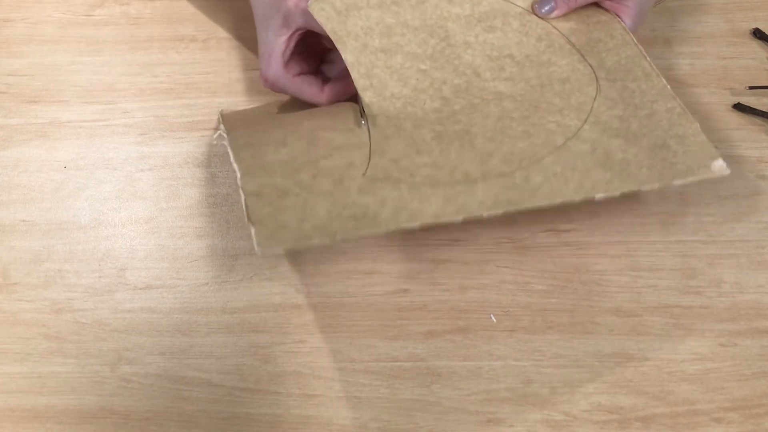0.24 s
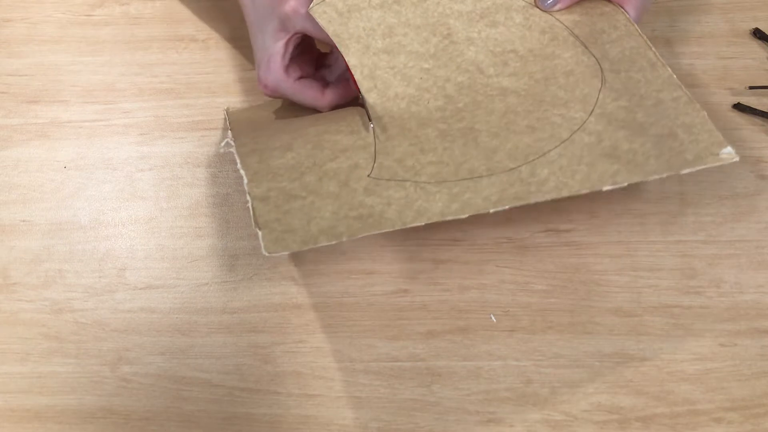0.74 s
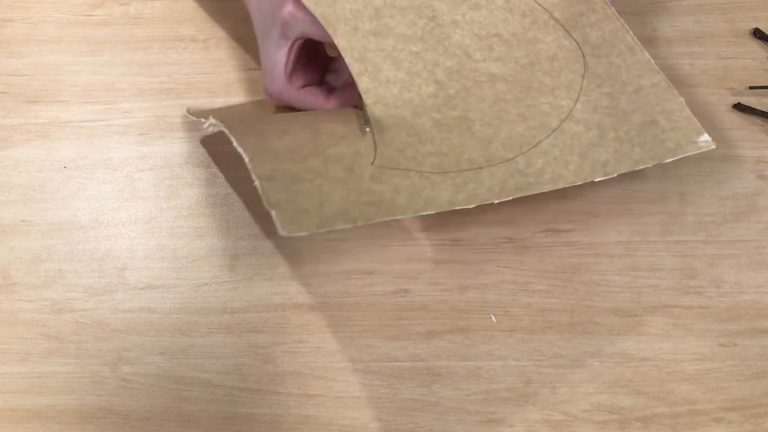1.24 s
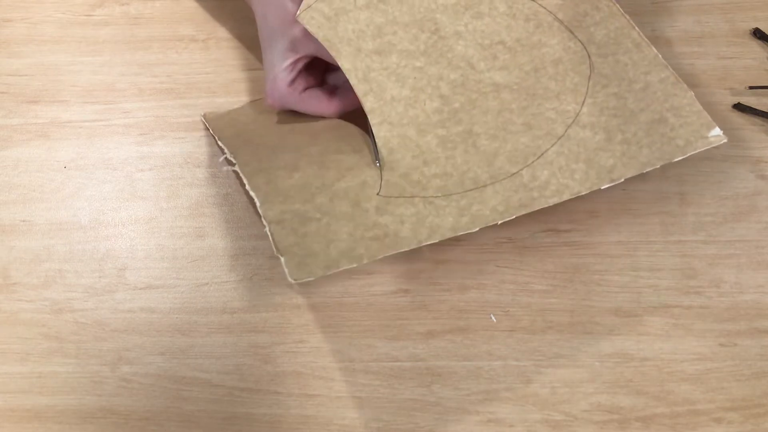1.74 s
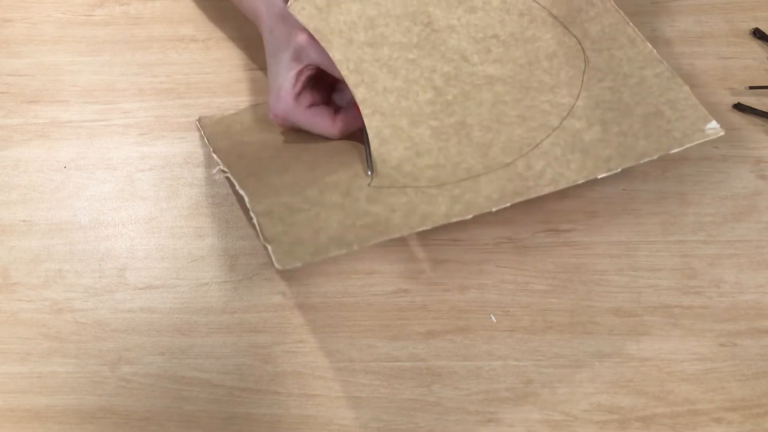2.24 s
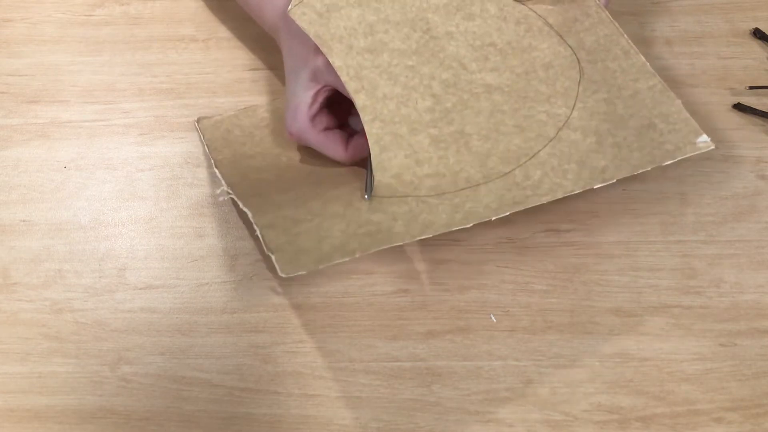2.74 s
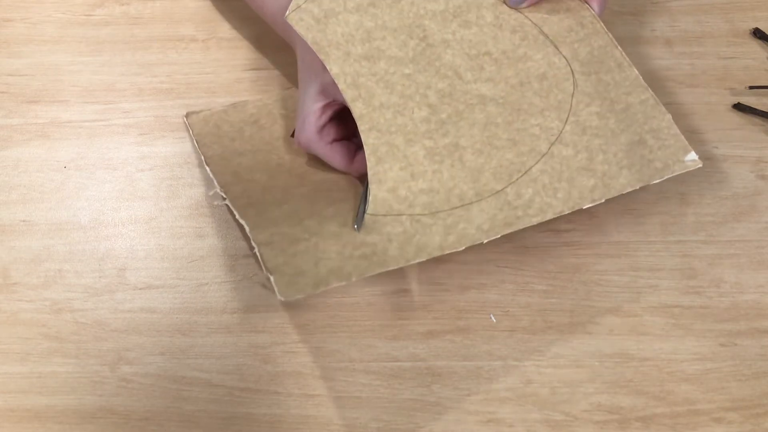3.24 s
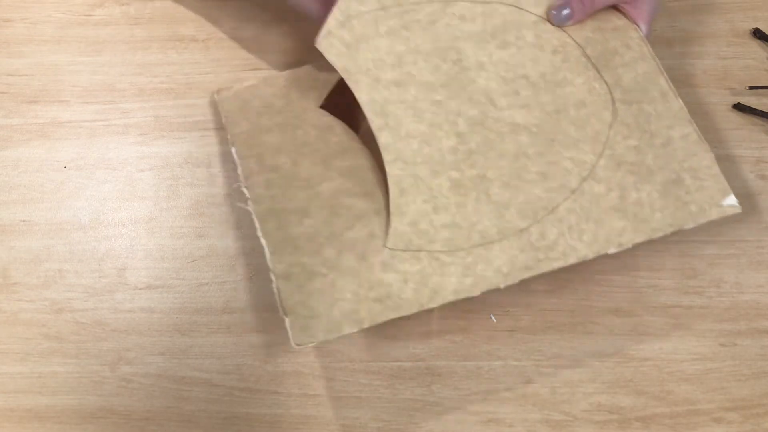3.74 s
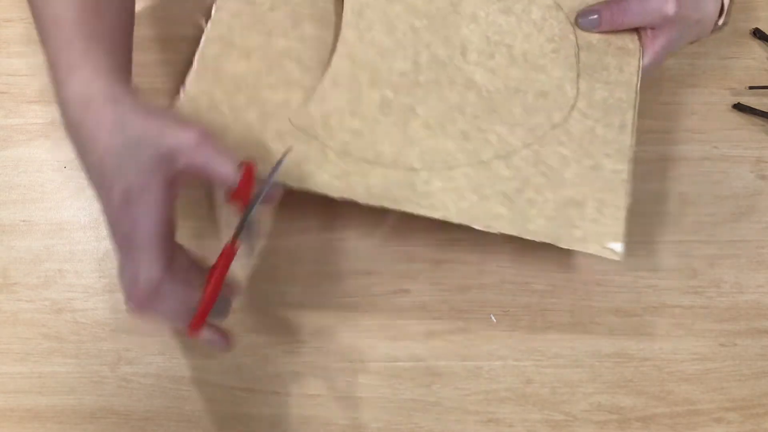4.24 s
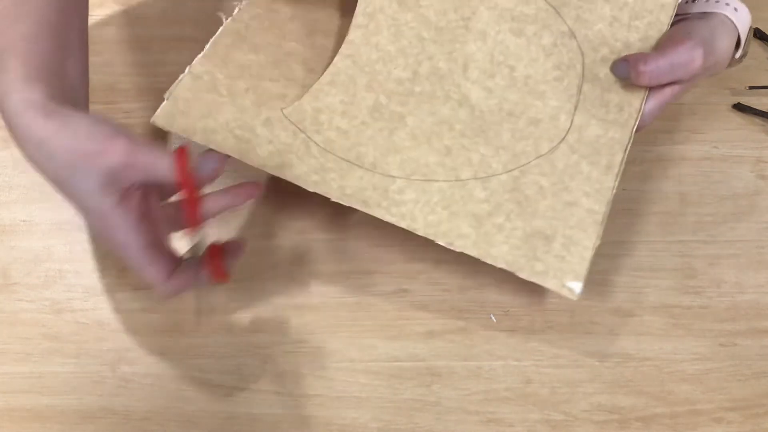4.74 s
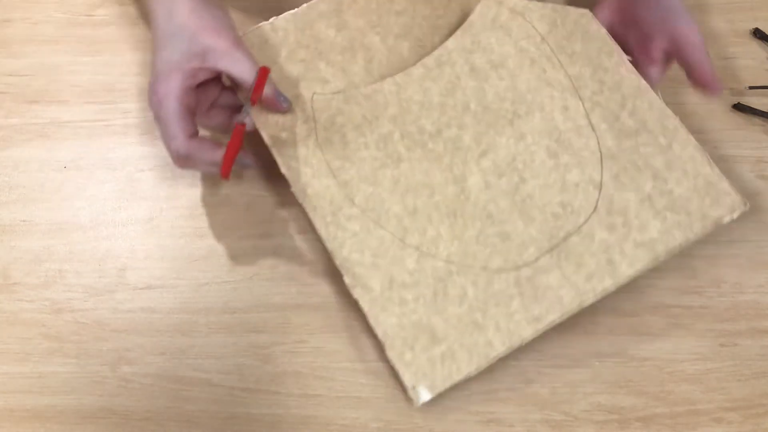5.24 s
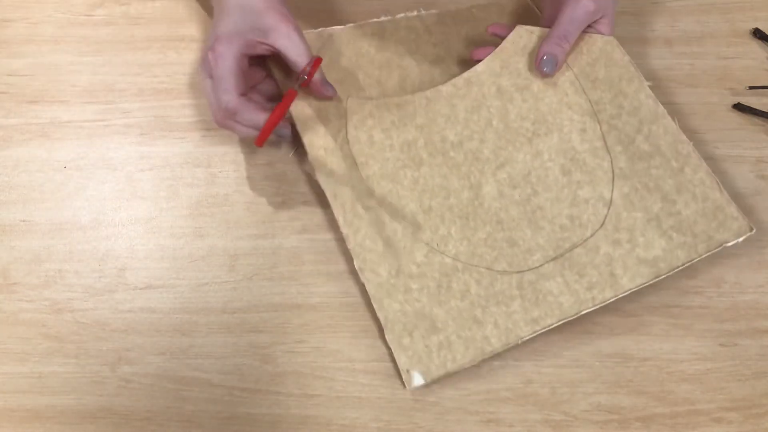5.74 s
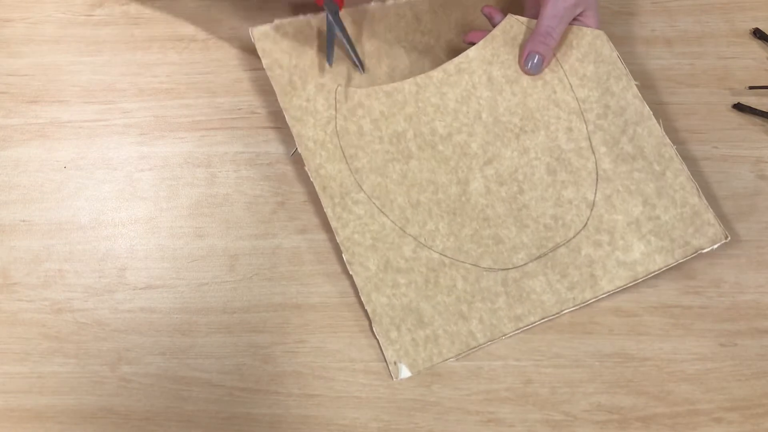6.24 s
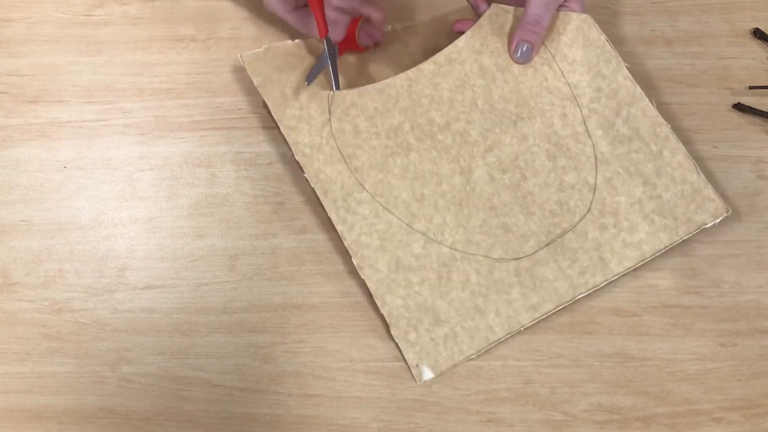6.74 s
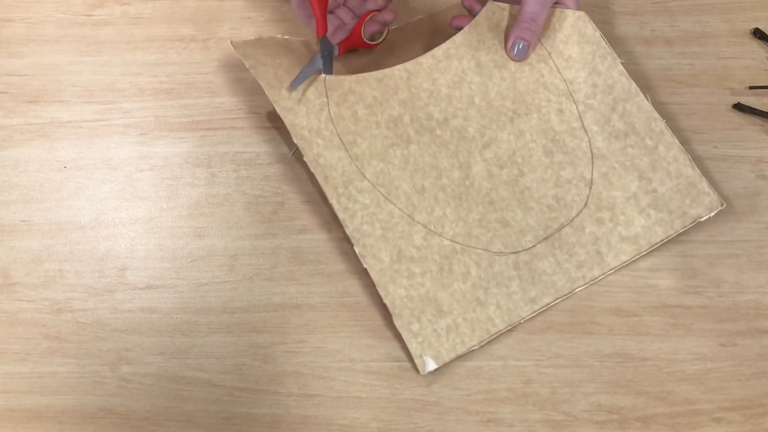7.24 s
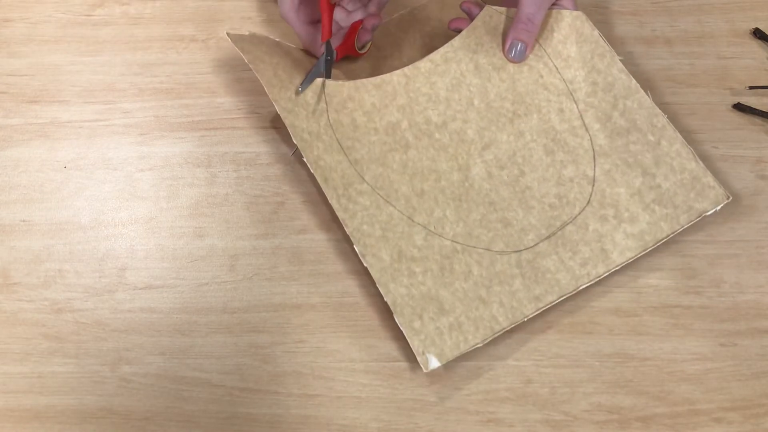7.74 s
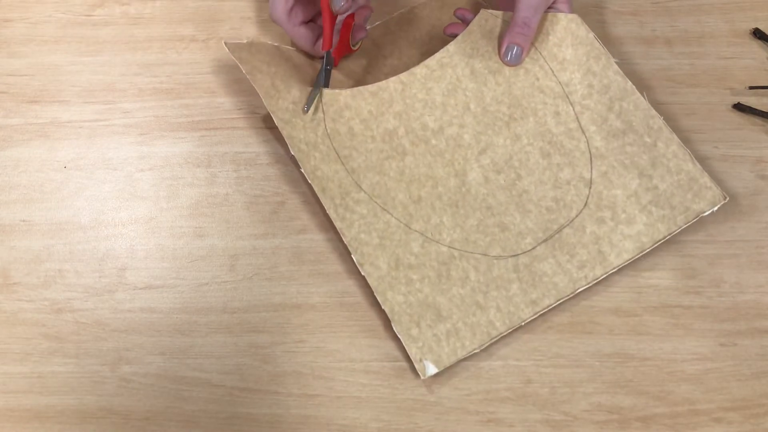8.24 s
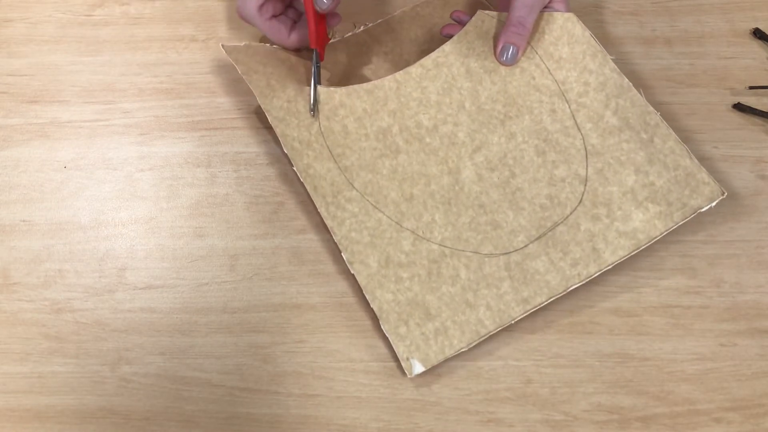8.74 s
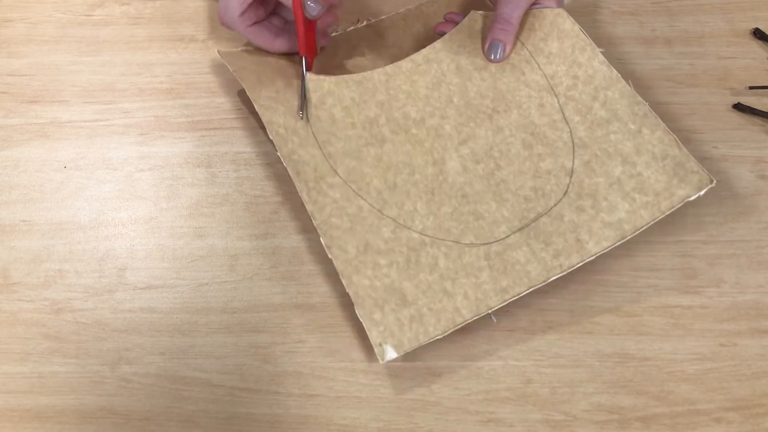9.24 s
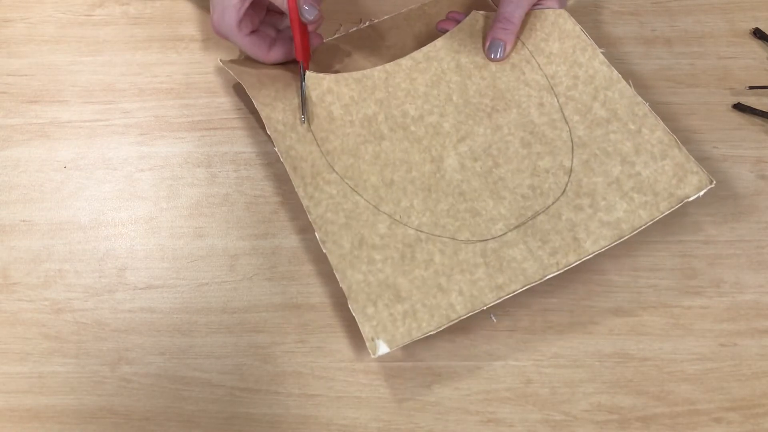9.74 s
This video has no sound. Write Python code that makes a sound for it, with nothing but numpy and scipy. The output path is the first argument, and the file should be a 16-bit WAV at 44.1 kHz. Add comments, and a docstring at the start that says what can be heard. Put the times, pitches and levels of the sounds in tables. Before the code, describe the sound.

Small scissors crunch through cardboard in short strokes, with scrapes and knocks as the sheet is turned, in a quiet room.

```python
"""Short crunches, close to a single microphone: small scissors cut corrugated cardboard just above a
wooden table, in a small, quiet room with a low hum. Each closing stroke crushes a run of flutes;
between strokes the blades slide on through the slit. The tips snap shut, the scissors are drawn out,
the sheet is turned, scraped and knocked, the table booms softly, and a second, gentler cut begins."""
import sys
import numpy as np
from scipy import signal
from scipy.fft import rfft, irfft
from scipy.io import wavfile

SR = 44100
rng = np.random.default_rng(int(sys.argv[2]) if len(sys.argv) > 2 else 0)


def inscribe(sig):
    """Save sig as 16-bit PCM at rate SR to the path in sys.argv[1].

    A 1-D sig is mono; a 2-D sig holds one channel per row.
    Samples are clipped to [-1, 1] before scaling.
    """
    pcm = np.round(np.clip(np.atleast_2d(sig).T, -1, 1) * 32767)
    wavfile.write(sys.argv[1], SR, pcm.astype(np.int16))


N = 440118
TREBLE_HZ = 4500
# closing strokes: start_s, length_s, shear_db, crunch_bass_db, crunch_treble_db, sheet_hz
STROKES = [(0, 0.054, -51.5, -3.5, -5, 864), (0.883, .14, -54, -2.5, -4.5, 865),
           (1.522, .17, -56, -2, -3, 740), (2.143, 0.16, -59, -3, -3.5, 830),
           (2.603, 0.07, -49, -8.5, -4.5, 850), (3.052, 0.084, -62, -3, 1, 810),
           (3.218, .12, -72, -5, -3.5, 1030), (8.689, 0.049, -51.5, -15, -4, 960),
           (8.798, 0.31, -67.5, -14, -5, 1004), (9.779, 0.13, -54, -11, -8.5, 925)]


def undb(db):
    """Decibels to gain."""
    return 10 ** (np.asarray(db) / 20)


def unit(x):
    """Scale to rms 1."""
    return x / np.sqrt(np.mean(x ** 2) + 1e-24)


def band(x, hz, width):
    """One resonance, gain 1 at its centre."""
    hz = min(hz, .45 * SR)
    return signal.lfilter(*signal.iirpeak(hz, hz / width, fs=SR), x)


def butter(x, hz, kind, order=4):
    """Butterworth filter."""
    return signal.sosfilt(signal.butter(order, hz, kind, fs=SR, output="sos"), x)


def colour(x, points, size=2048):
    """Minimum-phase filter through (Hz, dB) points, falling 12 dB an octave below the first."""
    hz, db = np.transpose(points)
    freq = np.maximum(np.arange(size // 2 + 1) * SR / size, 1)
    gain_db = np.interp(np.log(freq), np.log(hz), db) - 12 * np.maximum(np.log2(hz[0] / freq), 0)
    cepstrum = irfft(np.log(undb(gain_db)))
    cepstrum[1:size // 2] *= 2
    cepstrum[size // 2 + 1:] = 0
    return signal.fftconvolve(x, irfft(np.exp(rfft(cepstrum))))[:len(x)]


def balance(x, levels_db):
    """Bring each band of a hit to its level, taken as rms over 10 ms."""
    # bass, body, bite and treble: low_hz, high_hz
    band_edges = [(250, 650), (650, 1600), (1600, 4500), (4500, 15000)]
    power = 2 * abs(rfft(x)) ** 2 / len(x) / (SR / 100)
    hz = np.arange(len(power)) * SR / len(x)
    points = []
    for (low, high), db in zip(band_edges, levels_db):
        gain_db = db - 10 * np.log10(power[(hz >= low) & (hz < high)].sum() + 1e-20)
        points += [(low * 1.22, gain_db), (high / 1.15, gain_db)]
    return colour(x, points)


def envelope(t, attack, hold, sag_db, release_s):
    """A movement gathers speed, drops by sag_db while it lasts, then dies away."""
    rise = np.clip(t / max(attack, .002), 0, 1) ** 2
    sag = undb(-sag_db * np.clip((t - attack) / max(hold, .002), 0, 1))
    return rise * sag * np.exp(-np.maximum(t - attack - hold, 0) / release_s)


def tail(t, t60):
    """Dying noise of unit energy."""
    ring = rng.standard_normal(len(t)) * np.exp(-np.log(1000) * t / t60)
    return ring / np.linalg.norm(ring)


def fibres(count, per_s, spread_db):
    """Paper fibres snap at random, with unequal force."""
    snaps = (rng.random(count) < per_s / SR) * rng.choice([-1, 1], count)
    return unit(snaps * undb(spread_db * np.minimum(rng.exponential(size=count), 5)))


def sheet(force):
    """A force on the cardboard plus the resonances that it rings."""
    # resonances of sheet and blades: pitch_hz, width_hz, level_db
    sheet_modes = [(356, 9, 4), (415.5, 17, 6), (491, 64, -17), (882, 120, -5), (1210, 55, -23),
                   (1710, 87, -26), (2580, 300, -29), (3236, 104, -14.5), (4105, 34, -7.5), (6800, 67, -33),
                   (9000, 740, -15)]
    return force + sum(undb(db) * band(force, hz, width) for hz, width, db in sheet_modes)


def fractures(rows, rise_ms, ring_db, flutter_db, flutter_t60, tear_db, tear_ms):
    """Each hit is a few milliseconds of dense snapping that shakes the sheet."""
    # tone of crushed board: frequency_hz, gain_db
    crunch_colour = [(160, -17), (280, -12), (343, -7.5), (457, -11.5), (498, -4.5), (931, 9), (1420, 4),
                     (1800, 4), (4060, -4.5), (5420, -21), (6750, -19.5), (15000, -30), (16000, -51)]
    out, t = np.zeros(N + SR), np.arange(4096) / SR
    for start_s, db, bass_db, bite_db, treble_db, sheet_hz, length_ms in rows:
        push = (1 - np.exp(-t * 1000 / rise_ms)) * np.exp(-(t * 1000 / length_ms) ** 3)
        crush = fibres(len(t), per_s=15000, spread_db=1.5) * push
        # a few last fibres tear after the board has given way
        tear = fibres(len(t), per_s=1400, spread_db=12) * undb(tear_db) * np.exp(-t * 1000 / tear_ms)
        direct = colour(sheet(crush + tear), crunch_colour)
        # the free part of the sheet rings at a pitch set by how it is bent
        direct += undb(ring_db) * band(direct, sheet_hz, sheet_hz / 6)
        # bending waves run on through the board; the treble dies at once
        flutter = signal.fftconvolve(direct, tail(t, flutter_t60))[:len(t)]
        flutter = butter(flutter, 2500, "lowpass", order=2)
        hit = balance(direct + undb(flutter_db) * flutter, [bass_db, 0, bite_db, treble_db])
        start = int(start_s * SR)
        out[start:start + len(t)] += hit * undb(db)
    return out[:N]


def crunches():
    """Snaps take the tone of their stroke; harder ones are duller, lesser ones fall at random."""
    # louder snaps: flutes giving way, and the blade tips snapping shut as the first cut ends
    # start_s, level_db, brightness_db, length_ms
    loud_snaps = [(.002, -36.5, -8.5, 3.4), (.024, -39, -3, 8.1), (0.034, -42, -7, 3.2),
                  (.0475, -32.5, -9, 6.5), (.886, -44.5, -3.5, 9.8), (.895, -44, -2.5, 21),
                  (.924, -36, -8.5, 7), (.952, -35, -9, 5.5), (0.962, -37.5, -3.5, 8.5),
                  (0.9994, -32, -8.5, 3.3), (1.027, -46, -1.5, 5.5), (1.525, -44, 1.5, 11),
                  (1.551, -39, -6, 7.5), (1.567, -44, 1.5, 6.2), (1.59, -45, -5, 2.8),
                  (1.605, -38, -1, 8.5), (1.626, -39, -12, 9.2), (1.6492, -35, -2, 5.8),
                  (1.671, -45.5, -4, 3.6), (1.691, -47.5, -0.5, 4), (2.145, -50, 2, 4.1),
                  (2.153, -41.5, -4, 14.7), (2.179, -39.5, -1, 9.1), (2.187, -40.5, -4, 7.1),
                  (2.196, -41.5, -6, 7), (2.209, -40.5, -3.5, 7.6), (2.227, -42, -5, 14.5),
                  (2.254, -48.5, 2, 4.8), (2.261, -52, -2, 23), (2.284, -48, -4, 3.1),
                  (2.615, -46.5, -9, 9.8), (2.63, -41, -4.5, 11), (2.644, -44.5, 0.5, 10),
                  (2.679, -46, -1, 2.1), (2.668, -47, 0, 7.4), (2.694, -40, -6, 9.2),
                  (2.733, -32, -6.5, 11), (3.056, -49.5, 3.5, 8.6), (3.073, -51, -9, 11),
                  (3.085, -47, -9, 10), (3.1, -43.5, -2.5, 3.9), (3.1267, -38.5, -2.5, 4.7),
                  (3.162, -40.5, -6.5, 3.7), (3.227, -48, 0.5, 2.9), (3.2794, -32, -3, 8),
                  (3.3381, -29.5, -2, 12.5), (8.689, -49.5, 3.5, 8.5), (8.762, -51.5, 0, 4.6),
                  (8.804, -51.5, -4, 5.9), (8.84, -52.5, 2.5, 4), (8.941, -40.5, -2, 7.9),
                  (8.987, -50.5, -2.5, 6.5), (9.034, -57, 1, 2.3), (9.048, -45, -8, 18),
                  (9.0583, -37.5, -4, 1.85), (9.063, -36, -11, 2.8), (9.096, -35, -2, 4.8),
                  (9.824, -43, -3, 8), (9.838, -49.5, 5.5, 11.6), (9.861, -44.5, -1, 9.5),
                  (9.873, -51, -5, 11), (9.89, -39, -2, 1.1)]
    faint_crunch_db, dulling = -51.5, 0.22  # above this level, dB of treble lost per extra dB
    flex_scatter = 0.048  # share by which bending detunes the sheet from snap to snap
    lesser_per_s, lesser_spread_db, lesser_ms = 35, 3, 8.3
    rows, starts = [], [stroke[0] for stroke in STROKES]
    for start_s, db, bright_db, length_ms in loud_snaps:
        stroke = max(np.searchsorted(starts, start_s + .02) - 1, 0)
        *_, bass_db, treble_db, sheet_hz = STROKES[stroke]
        treble_db += bright_db - dulling * (db - faint_crunch_db)
        bent_hz = sheet_hz * (1 + flex_scatter * rng.standard_normal())
        rows.append((start_s, db, bass_db, bright_db, treble_db, bent_hz, length_ms))
    for start_s, length_s, shear_db, bass_db, treble_db, sheet_hz in STROKES:
        for k, (jitter, size) in enumerate(zip(rng.random(16), rng.standard_normal(16))):
            after_s = (k + jitter) / lesser_per_s
            if after_s < length_s:
                db = shear_db + 0.5 + lesser_spread_db * size
                rows.append((start_s + after_s, db, bass_db, 0, treble_db, sheet_hz, lesser_ms))
    return fractures(rows, rise_ms=.7, ring_db=3, flutter_db=-11.5, flutter_t60=.05,
                     tear_db=-20, tear_ms=9)


def friction(rows, per_s, spread_db, judder_db, judder_hz, rings_db, sag_db, release_s):
    """Fibres catch and let go under a moving edge; the grip judders, and each move has its own rings."""
    # tone of rubbed board: frequency_hz, gain_db
    rub_colour = [(300, -2), (420, -3.5), (650, 1.5), (880, 2), (1300, 1.5), (2000, -1.5), (3400, -7.5),
                  (4300, -11), (5000, -14), (6300, -15.5), (9000, -17.5), (12000, -17), (16000, -24)]
    # bass of the rubbing, lower while the sheet is held stiffly: time_s, gain_db
    rub_bass = [(0, 3.5), (1.5, 1.5), (2, -6), (5, 4.5), (5.7, -13), (6.5, -13.5), (7.2, -4), (9.9, -9.5)]
    ring_q, steel_q, steel_db = 10.7, 22.5, 4
    out, t = np.zeros(N + SR), np.arange(SR // 2) / SR
    for start_s, attack_s, hold_s, db, treble_db, *rings_hz in rows:
        judder = unit(butter(rng.standard_normal(len(t)), judder_hz, "lowpass", order=2))
        force = fibres(len(t), per_s, spread_db) * undb(judder_db * judder)
        force += undb(-12) * fibres(len(t), per_s=250, spread_db=0.5)  # coarser fibres
        bass_db = np.interp(start_s, *np.transpose(rub_bass))
        rub = colour(sheet(force), rub_colour)
        rub = colour(rub, [(330, bass_db), (640, bass_db), (860, 0)])
        for hz, boost_db in zip(rings_hz, rings_db):
            rub += (undb(boost_db) - 1) * band(rub, hz, hz / ring_q)
        # narrow steel rings fall elsewhere with every grip
        for hz in 3040 * 2 ** (1.68 * rng.random(5)):
            rub += (undb(steel_db) - 1) * band(rub, hz, hz / steel_q)
        body = unit(butter(rub, TREBLE_HZ, "lowpass"))
        treble = undb(treble_db) * unit(butter(rub, TREBLE_HZ, "highpass"))
        movement = envelope(t, attack_s, hold_s, sag_db, release_s)
        start = int(start_s * SR)
        out[start:start + len(t)] += undb(db) * (body + treble) * movement
    return out[:N]


def shearing(attack_s=0.0022, treble_db=-11.5):
    """The edges rub through the board for as long as a stroke closes."""
    rows = [(start_s, attack_s, length_s, db, treble_db, sheet_hz)
            for start_s, length_s, db, _, _, sheet_hz in STROKES]
    return friction(rows, per_s=7000, spread_db=3, judder_db=5, judder_hz=108,
                    rings_db=(4,), sag_db=4, release_s=0.049)


def room_tone():
    """Dull room noise and a wavering low hum, all around the microphone."""
    # tone of the room noise: frequency_hz, gain_db
    air_colour = [(34, -5), (115, -6.5), (200, -14), (376, -27), (750, -35.5), (1070, -34), (1450, -37.5),
                  (2260, -41.5), (5310, -48), (7390, -52), (11000, -52), (16000, -55.5)]
    # narrow bands of hum: pitch_hz, width_hz, level_db
    hum_bands = [(39.1, 15, -79), (63.9, 12.7, -56), (70.2, 6.5, -54.5), (100.5, 4, -68.5)]
    air = undb(-52) * unit(colour(rng.standard_normal(N), air_colour, size=16384))
    for hz, width, db in hum_bands:
        hum = band(band(rng.standard_normal(N + SR), hz, width), hz, width)
        air += undb(db) * unit(hum[SR:])
    return air


def blade_slides():
    """The blades rub in the slit as they reopen or slide on."""
    # slides: start_s, attack_s, hold_s, level_db, treble_db, sheet_hz, edge_hz, steel_hz
    slides = [(.14, 0.01, 0.14, -56.5, -10, 880, 3170, 6060), (.22, .02, .01, -43.5, -8, 870, 2750, 6200),
              (.27, 0.0097, 0.057, -46, -10, 890, 3000, 6850),
              (.45, 0.016, 0.31, -61.5, -8.5, 930, 3140, 6510),
              (.72, 0.02, .06, -61, -6.5, 940, 2820, 6510),
              (1.05, 0.031, 0.077, -51.5, -13, 900, 2820, 8500),
              (1.135, 0.014, 0.13, -50.5, -7.5, 940, 4470, 8600),
              (1.44, 0.062, 0.022, -60.5, -6, 790, 4180, 8740),
              (1.73, 0.045, 0.3, -65, -14, 790, 2520, 8740),
              (1.868, 0.0074, 0.072, -44, -9.5, 855, 2600, 7540),
              (1.96, .02, .14, -59.5, -7.5, 845, 2700, 7540),
              (2.425, 0.0091, 0.1, -46, -10, 754, 2200, 7900),
              (2.848, 0.0069, 0.038, -45, -6.5, 745, 2050, 6660),
              (3.53, 0.075, .005, -42, -5, 1320, 1820, 6000),
              (4.17, 0.008, 0.016, -58, -0.5, 1210, 3530, 12000),
              (4.23, 0.05, .01, -59, 0, 1220, 3500, 12000),
              (6.59, 0.035, 0.095, -55.5, -10, 1030, 1940, 5530),
              (6.72, 0.016, 0.14, -53, -11, 1000, 1890, 5700),
              (6.885, 0.017, 0.0062, -48.5, -4.5, 1000, 3380, 5670),
              (6.93, 0.025, 0.079, -56.5, -11, 1000, 1940, 6370),
              (7.04, 0.025, 0.09, -59.5, -8, 940, 2740, 5620),
              (7.185, 0.022, 0.048, -47.5, -14, 1410, 3680, 5950),
              (7.295, 0.016, .11, -57, -6, 1840, 2800, 5900),
              (7.43, 0.028, 0.31, -67.5, -6, 1590, 4100, 6400),
              (8.37, 0.016, 0.11, -57, -12.5, 845, 1820, 4600),
              (8.48, 0.077, 0.22, -64, -7, 860, 3100, 4400), (8.95, .02, 0.04, -59, -9, 870, 3000, 4500),
              (9.237, 0.012, 0.049, -44, -9.5, 920, 2420, 7500),
              (9.31, 0.017, 0.037, -47.5, -14.5, 870, 3240, 7300),
              (9.39, 0.024, .035, -52, -17, 850, 2380, 5900),
              (9.58, 0.019, 0.058, -63, -8.5, 860, 3650, 7900),
              (9.68, 0.0084, 0.12, -58.5, -9.5, 870, 1800, 4230)]
    return friction(slides, per_s=14000, spread_db=2, judder_db=2.5, judder_hz=106,
                    rings_db=(4.5, 6, 5), sag_db=5, release_s=0.029)


def sheet_knocks():
    """Sheet and scissors knock together."""
    # knocks: start_s, level_db, bass_db, bite_db, treble_db (all three re level), sheet_hz, length_ms
    knocks = [(0.43, -49.5, -11, -17, -23, 900, 7.5), (0.571, -38.5, -6, -8, -23, 980, 5.8),
              (0.578, -38.5, -11, -38, -23, 960, 8.5), (3.516, -58.5, -23, 6, 0, 1890, 4.4),
              (3.858, -49, -8, -17, -14, 850, 6), (3.8675, -38, -2.5, -7, -14.5, 850, 7.5),
              (4.043, -43.5, -16, -13.5, -17, 1270, 5), (4.24, -50, -7, -7.5, -7.5, 840, 6.7),
              (4.511, -62, -26, -2, -2, 1270, 3.1), (4.566, -54, -6, -6, -13, 678, 5.6),
              (4.982, -55, 4, 7.5, -1, 655, 5.6), (4.99, -53.5, 10, 5.5, 2, 533, 5.5),
              (5.737, -51, -38, -6.5, -18, 1310, 6.6), (6.26, -39.5, -13, -4, -16.5, 1200, 2.2),
              (6.268, -43, -9.5, -5.5, -18, 1180, 8.5), (6.428, -50.5, -33, -2.5, -30, 1260, 4),
              (6.777, -53, -14, -5, -13, 920, 5.7), (6.884, -49, -17, -3, -30, 920, 12),
              (7.278, -42, -39, -7, -17.5, 980, 5.6), (8.105, -60.5, 3, -11, -23, 650, 2.3),
              (8.21, -60, 3, -0.5, -22, 595, 14), (8.337, -48.5, -11, -4.5, -12, 800, 11)]
    return fractures(knocks, rise_ms=1, ring_db=0, flutter_db=-11, flutter_t60=.04,
                     tear_db=-24, tear_ms=7)


def sheet_scrapes():
    """Hand or scissors scrape over the sheet as it is turned."""
    # scrapes: start_s, attack_s, hold_s, level_db, treble_db, low_ring_hz, mid_ring_hz, high_ring_hz
    scrapes = [(3.655, 0.069, 0.029, -40, -9.5, 1440, 1715, 3320),
               (4.41, 0.038, 0.04, -46, -18.5, 1290, 1910, 5710),
               (4.61, 0.028, 0.0044, -52.5, -10, 1210, 3440, 5710),
               (4.8, 0.01, .003, -56, -18, 1000, 2300, 5260),
               (4.89, 0.0075, .003, -51, -11, 1000, 2330, 5260),
               (5.19, 0.062, 0.024, -59.5, -15.5, 1120, 3220, 8880),
               (5.48, 0.11, 0.012, -53, -9, 1180, 1830, 8950),
               (5.62, 0.054, 0.14, -64, -7.5, 1230, 1750, 5340),
               (5.73, 0.026, 0.12, -56, -9, 1280, 3250, 5370), (5.9, 0.04, 0.2, -66, -10, 1290, 1780, 5340),
               (6.29, 0.047, 0.13, -51, -17.5, 1170, 1740, 6900),
               (6.49, 0.058, 0.024, -41, -12, 1170, 2010, 5400)]
    return friction(scrapes, per_s=14000, spread_db=2.5, judder_db=3.5, judder_hz=92,
                    rings_db=(13, 7, 6), sag_db=6, release_s=0.019)


def blade_ticks():
    """The steel edges catch on each other with tiny bright clicks."""
    # catches: start_s, strength_db
    ticks = [(4.585, -47), (4.677, -53), (4.9356, -59), (5.0624, -48), (7.571, -57), (7.6151, -54),
             (7.63, -46), (7.681, -42), (7.708, -45.5), (7.7555, -48.5), (7.776, -51), (7.89, -50.5),
             (8.2995, -49), (8.3893, -58), (8.431, -39), (8.446, -48)]
    clicks = np.zeros(N)
    for start_s, db in ticks:
        clicks[int(start_s * SR)] = undb(db + 10)
    ring = tail(np.arange(SR // 20) / SR, t60=0.011)
    return butter(signal.fftconvolve(clicks, ring)[:N], 1700, "highpass", order=2)


def table_bump(start_s=8.09, level_db=-49):
    """A soft push sets the table top booming."""
    push = envelope(np.arange(N) / SR - start_s, attack=0.013, hold=0.15, sag_db=-1.5, release_s=0.012)
    boom = band(band(rng.standard_normal(N), hz=115, width=81), hz=120, width=85)
    return undb(level_db) * push * unit(boom)


def room(x, wet_db, t60, treble_wet_db, treble_t60):
    """The near walls answer within a few milliseconds; the treble is fainter and lingers longer."""
    t = np.arange(SR // 2) / SR
    response = undb(wet_db) * butter(tail(t, t60), TREBLE_HZ, "lowpass")
    response += undb(treble_wet_db) * butter(tail(t, treble_t60), TREBLE_HZ, "highpass")
    return x + signal.fftconvolve(x, response * np.minimum(t / 0.0046, 1))[:N]


def scene():
    """Cutting and handling close up, the room faint behind them, in mono."""
    air = room_tone()
    work = blade_ticks() + table_bump() + blade_slides() + sheet_scrapes()
    work += shearing() + sheet_knocks() + crunches()
    return (room(work, wet_db=-12, t60=0.15, treble_wet_db=-22.5, treble_t60=0.28) + air)[None]


def record(dry):
    """The microphone loses the deepest bass and the very top; its port hollows two treble bands."""
    # hollows of the port: centre_hz, width_hz, depth_fraction
    port_dips = [(4970, 510, 0.41), (10480, 720, 0.55)]
    dry = butter(dry, 35.6, "highpass", order=6)
    for hz, width, depth in port_dips:
        dry = dry - depth * band(dry, hz, width)
    return signal.sosfilt(signal.ellip(10, .2, 70, 16200, fs=SR, output="sos"), dry)


dry = scene()
out = record(dry)
inscribe(out)
```